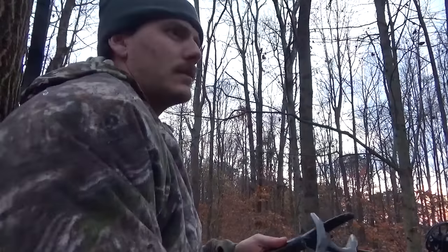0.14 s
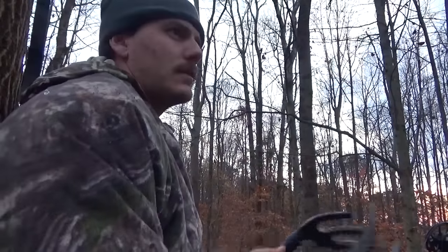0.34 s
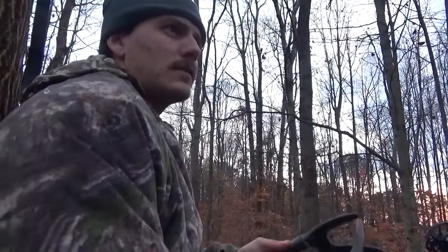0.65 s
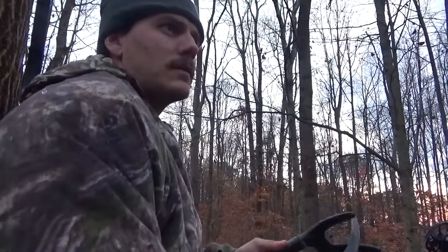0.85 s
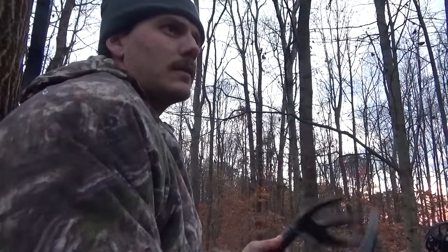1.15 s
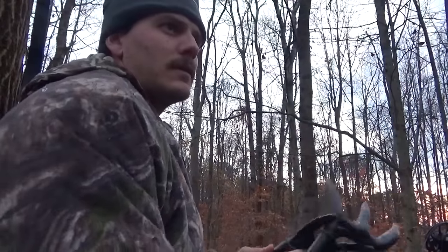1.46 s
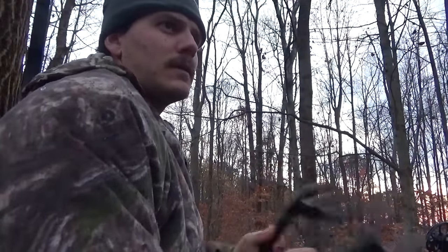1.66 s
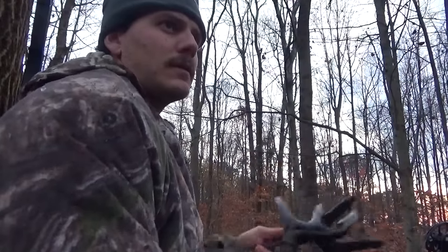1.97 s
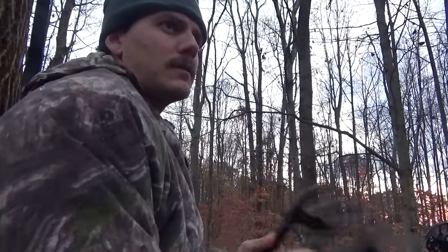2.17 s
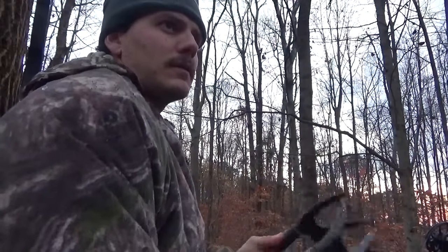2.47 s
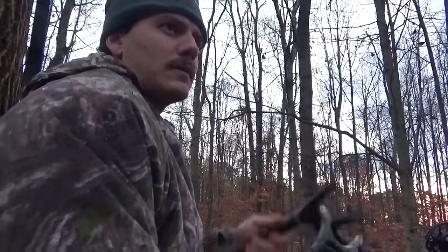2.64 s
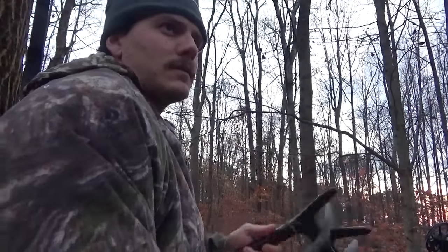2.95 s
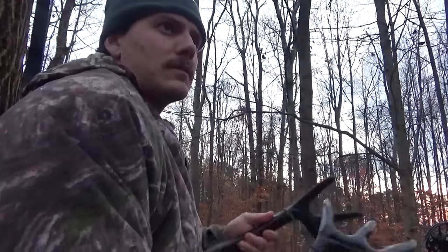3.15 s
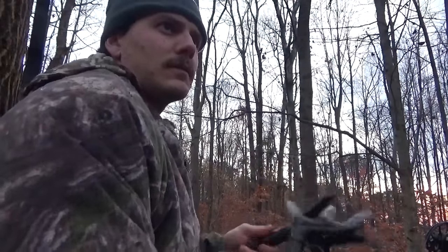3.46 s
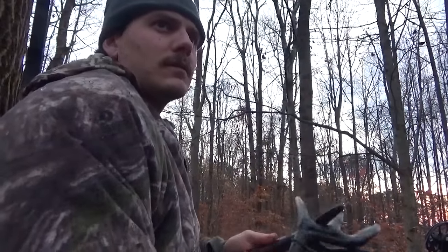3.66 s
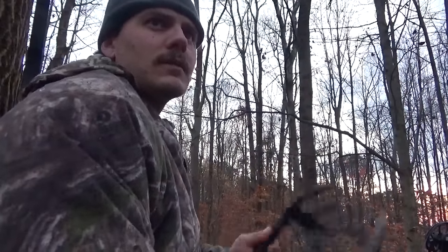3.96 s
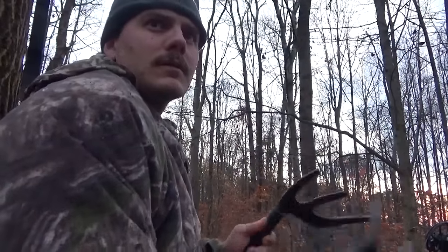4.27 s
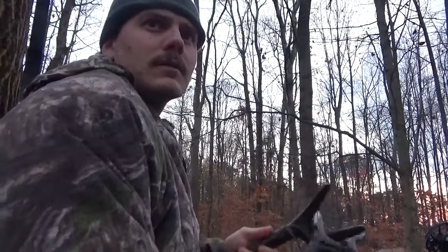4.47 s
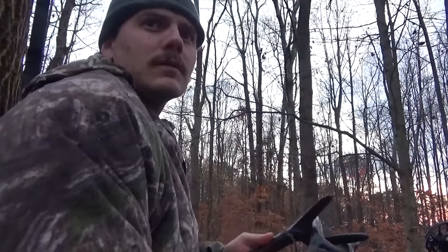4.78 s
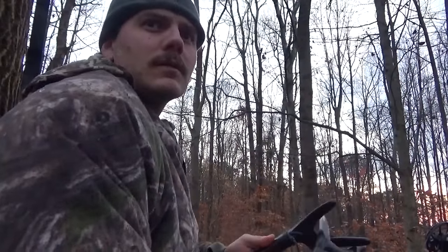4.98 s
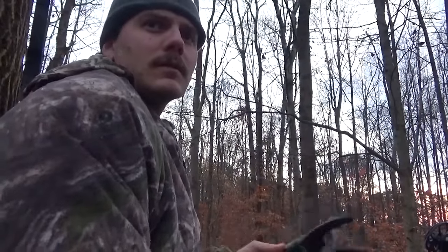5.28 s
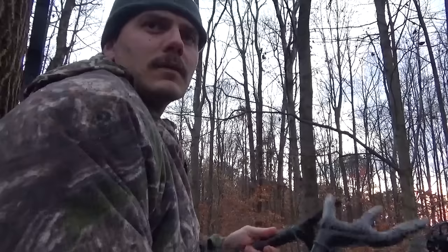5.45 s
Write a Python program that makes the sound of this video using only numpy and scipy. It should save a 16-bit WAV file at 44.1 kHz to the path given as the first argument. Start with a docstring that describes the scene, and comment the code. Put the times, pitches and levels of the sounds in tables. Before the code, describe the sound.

Two deer antlers clack and grind together in fast, uneven bursts with brief pauses, close by in quiet bare woods.

```python
"""Antlers rattled in bare woods

Two antlers clash and grind in quick runs, a step away from a camera. Each blow snaps and briefly rings
a bank of decaying bone modes; between blows, sliding tines excite the modes with random ticks.
Trunks return a thin echo of sparse decaying taps over a quiet floor of shaped noise.
The camera's limiter holds the loudest clacks down."""
import sys
import numpy as np
from scipy import signal
from scipy.fft import rfft, irfft
from scipy.io import wavfile
from scipy.ndimage import uniform_filter1d

SR = 44100
rng = np.random.default_rng(int(sys.argv[2]) if len(sys.argv) > 2 else 0)


def pcm_store(signal):
    """Save signal as 16-bit PCM."""
    levels = np.round(np.clip(np.atleast_2d(signal), -1, 1) * 32767)
    wavfile.write(sys.argv[1], SR, levels.astype(np.int16).T)


N = 247842

# Blows. Each row: start in seconds, relative strength in dB, two favoured pitches in Hz,
# brightness in dB (high modes up, low modes down).
BLOWS = [(0.0816, -38, 2430, 757, -20), (0.3197, -22, 2530, 1930, -4.5), (0.3546, -4, 1920, 4250, -0.5),
         (.372, -21, 1810, 4580, 3), (.38, -12.5, 6300, 5030, 6), (.393, -15, 3000, 1770, -6),
         (0.3969, -9.5, 4630, 1592, -10.5), (0.4095, -6.5, 4460, 1750, -14), (.423, -5.5, 4040, 1488, -9),
         (0.4387, -13, 3760, 4950, 9), (0.452, -8.5, 1944, 1655, -6), (0.4574, -11.5, 2765, 2010, -11),
         (0.4672, -12.5, 2800, 2480, -6), (0.5585, -8.5, 4440, 3560, 6), (.572, -11.5, 4540, 2070, -0.5),
         (.584, -17.5, 3350, 4500, -5), (0.6288, -33.5, 1590, 2100, -11), (.7214, -29, 3780, 1620, -3),
         (1.0972, -38.5, 1720, 1310, -11), (1.1165, -30, 2030, 1650, -9), (1.1493, -38.5, 1800, 733, -11),
         (1.2382, -8, 3160, 1900, 2), (1.244, 0, 3620, 2510, 5.5), (1.257, -5, 1624, 2070, 2),
         (1.2675, -8.5, 2680, 1840, 1), (1.2834, -15.5, 1990, 3750, -6), (1.32, -10, 5020, 1960, 5.5),
         (1.3317, -19.5, 3620, 1204, -9), (1.3892, -6.5, 4690, 2950, 8), (1.4622, -33.5, 1620, 1260, -16),
         (1.5418, -26.5, 3870, 1730, -15), (1.5603, -21, 4540, 1210, 0.5), (1.6349, -7, 6180, 4480, 4),
         (1.652, -15.5, 4000, 1890, 0), (1.7124, -3, 5830, 3143, -3), (1.7228, -6, 3200, 1573, 2),
         (1.7379, -8, 7000, 3420, 7), (1.7585, -11, 4630, 1950, 0.5), (1.762, -8, 4950, 1590, 4),
         (1.7829, -10.5, 3800, 3180, 1), (1.8161, -8.5, 4190, 5680, 3.5), (1.8347, -12.5, 2710, 1124, -6),
         (1.844, -19.5, 3170, 1890, -13), (1.8735, -13, 1990, 1364, -6), (1.8897, -9.5, 2895, 1780, -11.5),
         (1.975, -15, 1800, 2926, -12.5), (1.99, -18.5, 1230, 890, -14), (2.0251, -26.5, 4000, 960, -16),
         (2.0378, -27.5, 4130, 2520, -5), (2.1777, -7.5, 3170, 1587, 5.5), (2.1853, -11, 1950, 805, -5.5),
         (2.2048, -6.5, 6640, 4450, 6), (2.2277, -3, 4280, 1773, -6), (2.2434, -8.5, 2950, 1086, -5),
         (2.2491, -9, 2700, 1840, -14), (2.2579, -10, 1850, 3050, -5), (2.2745, -7, 3940, 1900, -9.5),
         (2.2932, -20, 1380, 1860, -10), (2.326, -20.5, 2390, 1420, -9), (2.34, -28, 1580, 900, -2),
         (2.4413, -9, 3560, 5150, 3.5), (2.454, -28, 3580, 2280, 7), (2.465, -24, 2360, 1270, -6),
         (2.5245, -10, 4800, 3980, 4), (2.535, -23, 3700, 2950, -6), (2.5671, -15, 4530, 2200, -2),
         (2.584, -11.5, 6760, 3820, 6), (2.596, -19, 3880, 2320, 1), (2.609, -18.5, 3150, 2100, 2),
         (2.6354, -7, 2140, 1041, -12.5), (2.6506, -13.5, 2160, 996, -10), (2.6596, -11, 2080, 5140, -3),
         (2.6866, 0, 5810, 3640, 9.5), (2.694, -6.5, 5150, 3730, 3), (2.699, -11, 3680, 1930, 3),
         (2.822, -1.5, 5280, 4680, 1.5), (2.8413, -6, 4620, 3850, -1), (2.852, -10, 4310, 2730, -6),
         (2.9025, -1.5, 3570, 2130, 1), (2.9126, 7, 4010, 6570, -2.5), (3.0115, -9, 4630, 3930, 6),
         (3.0201, -8.5, 5760, 4100, 4.5), (3.0264, -11, 4170, 3000, 1), (3.0379, -14.5, 3070, 3710, -2),
         (3.0867, -24.5, 4330, 2020, 0), (3.1382, -5.5, 5760, 4630, 5.5), (3.2386, -6.5, 3470, 4250, 5),
         (3.2927, -6.5, 3550, 1800, 0.5), (3.3324, 6, 5780, 3240, 5.5), (3.3364, 6.5, 5840, 1920, 3),
         (3.348, 1.5, 4370, 1730, -3.5), (3.359, -3.5, 4500, 1830, 7), (3.4154, -6, 2940, 1825, -8.5),
         (3.424, -19, 6200, 690, 23), (3.489, -27, 2930, 2150, -4), (3.569, -18, 1234, 2230, -11),
         (3.59, -30.5, 1800, 960, -21), (3.64, -9.5, 2950, 1395, -7.5), (3.664, -24, 1406, 840, -11),
         (3.8846, -36, 2930, 1605, -2), (3.916, -8.5, 4900, 3670, 6.5), (3.9305, -9, 4700, 3830, -2),
         (3.9742, 0.5, 6200, 2220, 5), (4.0042, -10.5, 4810, 2045, -3.5), (4.031, -25, 2000, 790, -16),
         (4.0455, -4, 4300, 6220, 8), (4.071, -8, 3460, 2220, -8), (4.0815, -4.5, 4580, 1614, -6.5),
         (4.0877, -14, 1640, 1070, -13), (4.0978, -8, 3470, 4630, -1), (4.1109, -8.5, 2080, 4420, -8),
         (4.1194, -9, 2180, 4470, -4.5), (4.141, -22, 3370, 2240, 2), (4.1492, -0.5, 2970, 1660, -3),
         (4.1581, -7, 2800, 1099, -4), (4.1674, -14.5, 2940, 1140, -14), (4.2243, -29, 2180, 813, -13),
         (4.2419, -19, 2170, 1650, -4.5), (4.264, -8.5, 1870, 4050, 2.5), (4.3831, -3.5, 4060, 5300, 6),
         (4.3935, -7, 6260, 1830, -1.5), (4.421, -5.5, 5420, 3207, -2.5), (4.4373, -13.5, 2180, 1660, -3),
         (4.4508, 4.5, 3615, 1770, -4), (4.468, -18, 3400, 556, -10), (4.475, -11.5, 5290, 2910, -11),
         (5.05, -10, 4780, 3550, 7.5), (5.0739, -13, 4760, 5780, -4), (5.0997, -9, 4400, 1910, -1),
         (5.1192, 0, 4560, 5810, 0.5), (5.1439, -19, 2040, 1480, -2), (5.1823, -9.5, 4340, 1640, 2),
         (5.2013, -10.5, 6420, 2440, -2), (5.2093, -7.5, 3010, 3800, -4), (5.2287, -12.5, 1600, 1250, -12),
         (5.2436, -5, 5150, 2490, -2), (5.2582, -16.5, 1520, 788, -17.5), (5.2708, -4.5, 3360, 4110, -4.5),
         (5.292, -5.5, 2800, 2450, -2), (5.2952, -8.5, 2420, 1790, -5), (5.3439, -7.5, 3540, 2480, 0.5),
         (5.362, -5, 3540, 2990, -2), (5.4269, -20, 2900, 1810, -5), (5.4982, -8, 2830, 4250, 3.5),
         (5.5219, -11, 5500, 2960, -1), (5.6036, -8, 3870, 1747, 3)]
# Tines sliding on each other. Each row: start and end in seconds, pressure at start and at end in dB,
# centre of the favoured pitch in Hz.
SCRAPES = [(0.075, 0.254, -48, -68, 1295), (0.224, 0.28, -49.5, -51.5, 1150),
           (.266, 0.321, -46, -35.5, 2400), (0.357, .474, -37, -18.5, 2970),
           (0.467, 0.543, -34, -29.5, 1830), (0.562, 0.603, -43, -37.5, 2250),
           (0.688, 0.726, -50, -48, 1990), (1.041, 1.12, -55, -51, 1735), (1.243, 1.313, -30.5, -29, 1926),
           (1.32, 1.396, -54, -34.5, 1250), (1.377, 1.448, -30, -50.5, 3920),
           (1.468, 1.562, -51, -31.5, 1594), (1.663, 1.683, -31, -51, 1330),
           (1.732, 1.777, -17, -34.5, 4220), (1.803, 1.881, -38, -27, 3100),
           (1.867, 2.01, -27, -41.5, 1738), (2, 2.061, -36.5, -35.5, 2380),
           (2.217, 2.272, -20.5, -21, 1807), (2.28, 2.372, -22.5, -42, 1850),
           (2.351, 2.443, -41, -37.5, 2234), (2.481, 2.527, -47, -37, 3300),
           (2.582, 2.691, -28.5, -30.5, 2240), (2.692, 2.723, -38, -32, 1930),
           (2.861, 2.901, -34, -45, 1620), (2.921, 2.97, -6, -44, 1730), (3.064, 3.098, -50, -33, 3230),
           (3.333, 3.412, -10.5, -41, 1850), (3.413, 3.451, -14, -48, 1052), (3.652, 3.69, -26, -56, 1350),
           (3.861, 3.891, -58, -31, 1600), (4.077, 4.144, -18.5, -38, 1646), (4.17, 4.2, -26, -45, 1190),
           (4.209, 4.238, -49, -22, 2150), (4.385, 4.475, -31, -19, 556), (4.457, 4.516, -23, -37, 1147),
           (5.184, 5.302, -29, -26, 1670), (5.355, 5.415, -29.5, -37, 1530)]
# Bone modes. Each row: frequency in Hz, relative level in dB, t60 in seconds before damping by the hands.
BONE_MODES = [(327.4, -11, 0.067), (411.6, -18, 0.11), (556, -17, 0.19), (690, -20, 0.052), (790, -8, 0.13),
              (960, -6.5, 0.061), (1126, -5, 0.091), (1358, -0.5, 0.063), (1646, -1.5, 0.078),
              (1850, 1.5, 0.038), (2080, 4, 0.036), (2220, -6.5, 0.044), (2450, -1.5, 0.055),
              (2800, -3.5, 0.05), (2950, 2.5, 0.037), (3405, 3.5, 0.029), (3906, 6, 0.022), (4300, 2, 0.04),
              (4450, 3.5, 0.024), (4606, 1, 0.023), (4834, 2.5, 0.027), (5415, 10.5, 0.016),
              (5780, 7, 0.024), (6200, 7.5, 0.023), (6575, 7, 0.028), (6880, 2.5, 0.019),
              (7720, -1.5, 0.022), (8910, 3, 0.018), (8770, -14, 0.021), (9700, -3, 0.03)]
# Spectrum of the contact snap. Each row: frequency in Hz, relative level in dB.
SNAP_COLOUR = [(300, -42), (1000, -6.5), (2500, -3.5), (5000, -3), (7500, 4.5), (11000, -10.5)]
# Copies off body and ground. Each row: delay in seconds, left level in dB, right level in dB.
BOUNCES = [(.0027, -18, -23), (.0046, -16.5, -17), (.0085, -31, -25)]
# Echo decay. Each row: frequency in Hz, t60 in seconds.
WOODS_T60 = [(250, 0.93), (700, 0.75), (2000, 1), (4500, 0.89), (7000, 0.55), (10000, 0.43)]
# Echo spectrum. Each row: frequency in Hz, relative level in dB.
WOODS_COLOUR = [(500, 10), (1100, 3), (2000, 0.5), (2700, -0.5), (3900, 0.5), (6000, 3), (10000, 7)]
# Background spectrum. Each row: frequency in Hz, relative density in dB per Hz.
AIR_COLOUR = [(30, -7), (70, -20), (110, -40), (122, 2.5), (136, -13), (300, -9), (800, -5.5), (2000, -8),
              (4000, -12.5), (11000, -20)]
# Background width. Each row: frequency in Hz, left-right likeness (1 = identical).
AIR_LIKENESS = [(60, .85), (130, 1), (270, 0.83), (800, 0.49), (3000, 0.58), (10000, 0.74)]
# Antlers right of centre. Each row: frequency in Hz, left minus right level in dB.
LEAN = [(300, 0.5), (1100, -.55), (4000, -1.2), (10000, -2.8)]
# How far one contact strays sideways. Each row: frequency in Hz, level in dB.
SWAY = [(300, -11.5), (2000, -13), (5000, -14.5), (10000, -8)]
# The antlers' sound carries little bass. Each row: frequency in Hz, level in dB.
THINNESS = [(30, -38), (120, -32), (300, -8), (600, 0)]

AIR_RMS_DB, ECHO_DB = -55, -21.5
SENSOR_HZ, LAST_EDGE_HZ = 11050, 12220
OUTER_DB = -8.0  # low and high modes both sit under the middle ones
GRIP_FACTOR, GRIP_SPREAD = 1.17, 0.12  # damping by the hands; its log scatter from blow to blow
GRIP_PER_DB = 0.0066  # bright blows on the tine tips die sooner, dull ones on the beam ring on
SCRAPE_DAMPING_FACTOR, TICKS_PER_S = 3.93, 2200
DULL_AT_2KHZ_DB, DULL_DB_PER_OCTAVE = 4.5, 1.5  # scrapes are dull, more so the lower they ring
LIMIT_DB, LIMITER_LAG_S, RELEASE_DB_PER_S = -3.5, 0.0001, 540.0
CEILING = 0.8


def gain_of(db):
    """Amplitude factor of a dB level."""
    return 10 ** (np.asarray(db) / 20)


def evened(x):
    """Scales x to unit RMS."""
    return x / np.sqrt(np.mean(x ** 2) + 1e-20)


def read(points, hz):
    """Reads a curve along log frequency."""
    f, value = np.transpose(points)
    return np.interp(np.log(hz + 1), np.log(f + 1), value)


def add(mix, start_s, sound):
    """Adds a sound to mix in place, cut at the end."""
    part = mix[round(start_s * SR):][:len(sound)]
    part += sound[:len(part)]


def coloured(x, points):
    """Weights the spectrum of x by a dB curve."""
    hz = np.fft.rfftfreq(x.shape[-1], 1 / SR)
    return irfft(rfft(x) * gain_of(read(points, hz)), x.shape[-1])


def low_pass(x, hz):
    """Steep linear-phase band edge."""
    taps = signal.firwin(401, hz, window=("kaiser", 8), fs=SR)
    return signal.oaconvolve(x, taps[None], "same")


def air():
    """A faint far hum, rumble and hiss: shaped stereo noise with slowly drifting patches."""
    frames, hz = N // 1024 + 5, np.fft.rfftfreq(4096, 1 / SR)
    a, b, c, d, patches_db = rng.standard_normal((frames, 2049, 5)).T
    patches_db = uniform_filter1d(patches_db, size=40, axis=0)  # across frequency
    patches_db = evened(uniform_filter1d(patches_db, size=4, axis=1))  # across time
    same = np.clip(read(AIR_LIKENESS, hz), -1, 1)[:, None]
    left = a + 1j * b
    right = same * left + np.sqrt(1 - same ** 2) * (c + 1j * d)
    z = np.array([left, right]) * gain_of(read(AIR_COLOUR, hz)[:, None] + patches_db)
    noise = signal.istft(z, nperseg=4096, noverlap=3072)[1][:, :N]
    return gain_of(AIR_RMS_DB) * evened(noise)


def ring(t, shade, pitches_hz, damping, chance):
    """Bone modes start together; the place of contact favours two pitches and shades low against high."""
    hz, mode_db, t60_s = np.transpose(BONE_MODES)[:, :, None]
    luck, detune, side = chance.T[:, :, None]
    start_db = mode_db + read(shade, hz) + 10.4 * (luck - .5)
    hz = hz * (1 + 0.00068 * np.sqrt(hz) * (detune - .5))  # the grip shifts high modes more
    for pitch_hz, favour_db in zip(pitches_hz, (8.0, 7.0)):
        apart = abs(np.log(hz / pitch_hz))
        nearest = apart == apart.min()
        start_db = start_db + favour_db * np.exp(-(apart / 0.1) ** 2) + 3.94 * nearest
        hz = np.where(nearest, pitch_hz, hz)  # nearest mode is drawn onto the pitch
    rise = 1 - np.exp(-t * hz / 1.55)  # low modes take longer to swing up
    swing = np.sign(side - .4) * rise * np.sin(2 * np.pi * hz * t)
    level_db = start_db - 60 * t * np.clip(damping, .7, 4) / t60_s
    return (gain_of(level_db) * swing).sum(0)


def grind():
    """Ridges catch and slip in uneven ticks; the ring's colour drifts as the contact slides along."""
    tick_gain = gain_of(3.5 * np.minimum(rng.exponential(1, N), 4))
    ticks = tick_gain * (rng.random(N) < TICKS_PER_S / SR) * rng.standard_normal(N)
    out, t = np.zeros((2, N)), np.arange(2048) / SR  # rows: sound, sideways stray
    chance = rng.random((len(SCRAPES), 3, len(BONE_MODES), 3))
    sides = rng.standard_normal(len(SCRAPES))
    for (start_s, end_s, start_db, end_db, pitch_hz), places, side in zip(SCRAPES, chance, sides):
        dull_db = DULL_AT_2KHZ_DB + DULL_DB_PER_OCTAVE * np.log2(2000 / pitch_hz)
        shade = [(400, 2 * dull_db), (2500, 0.0062), (8000, -dull_db)]
        slips = evened(ticks[round(start_s * SR):round(end_s * SR)])
        along = np.linspace(0, 2, len(slips))
        pressure = gain_of(np.linspace(start_db, end_db, len(slips)))
        pressure = pressure * signal.windows.tukey(len(slips), .25)
        for k, c in enumerate(places):  # crossfade through three contact places
            pitches_hz = (pitch_hz * (.94 + 0.126 * c[1, 0]), 1500 + 3500 * c[0, 0])
            body = ring(t, shade, pitches_hz, SCRAPE_DAMPING_FACTOR, c)
            here = np.cos(np.pi / 2 * np.clip(along - k, -1, 1))
            sound = signal.fftconvolve(slips * pressure * here, body / np.linalg.norm(body))
            add(out[0], start_s, sound)
            add(out[1], start_s, side * sound)
    return out


def blow(strength_db, first_hz, second_hz, bright_db, chance, noise, hold):
    """A sharp noise snap of contact over the ringing bone; the snap's treble dies first."""
    t = np.arange(len(noise)) / SR
    shade = [(1200, OUTER_DB - bright_db), (2600, 0.023), (5000, 0.041), (7500, OUTER_DB + bright_db)]
    damping = GRIP_FACTOR * np.exp(GRIP_PER_DB * bright_db + GRIP_SPREAD * hold)
    bone = ring(t, shade, (first_hz, second_hz), damping, chance)
    snap = coloured(coloured(noise, SNAP_COLOUR), shade)
    dull = coloured(snap, [(4000, 6.5), (8000, -44)])
    fade_db = -60 * t * np.clip(damping, .3, 4)
    # t60 before damping: 0.04 s dull part, 0.022 s rest
    snap = dull * gain_of(fade_db / 0.04) + (snap - dull) * gain_of(fade_db / 0.022)
    bone_rms, snap_rms = [np.sqrt(np.mean(v[:300] ** 2)) for v in (bone, snap)]
    sound = bone / bone_rms + gain_of(-3.0) * snap / snap_rms
    return gain_of(strength_db - 6.5) * sound / np.sqrt(np.mean(sound[:300] ** 2))


def clacks():
    """Every blow in its place; the second row is how far each strays to one side."""
    chance = rng.random((len(BLOWS), len(BONE_MODES), 3))
    noise = rng.standard_normal((len(BLOWS), 3072))
    side_hold = rng.standard_normal((len(BLOWS), 2))
    out = np.zeros((2, N))
    for (start_s, *row), c, n, (side, hold) in zip(BLOWS, chance, noise, side_hold):
        sound = blow(*row, c, n, hold)
        add(out[0], start_s, sound)
        add(out[1], start_s, side * sound)
    return out


def nearby(x, stray):
    """Direct sound, treble leaning right, strays with each contact; body and ground add quick copies."""
    lean = np.array(LEAN)
    # a quarter turn: it arrives earlier at one port, not louder
    stray = signal.hilbert(coloured(stray, SWAY)).imag
    out = np.array([x + stray, x - stray])
    for delay_s, left_db, right_db in BOUNCES:
        lag = round(delay_s * SR)
        out[0, lag:] += gain_of(left_db) * x[:-lag]
        out[1, lag + 1:] += gain_of(right_db) * x[:-lag - 1]
    return np.array([coloured(out[0], lean * [1, .5]), coloured(out[1], lean * [1, -.5])])


def woods(x):
    """Trunks scatter sound: sparse taps of random sign, each band dying at its own speed."""
    slots, out = np.arange(400, SR - 20, 20), 0
    for k in range(3):  # three random tails fade in and out in turn, so no band of the echo stands still
        taps = np.zeros((3, SR))
        at = slots + rng.integers(0, 20, (3, len(slots)))
        np.put_along_axis(taps, at, rng.choice([-1., 1.], at.shape), 1)
        taps = 0.94 * taps[2] + 0.73 * taps[:2]  # much of the echo reaches both ports alike
        hz, t, z = signal.stft(taps, SR, nperseg=256)
        build = 1 - np.exp(-t / 0.01)  # more trunks answer as the wave spreads
        fade_db = read(WOODS_COLOUR, hz)[:, None] - 60 * t / read(WOODS_T60, hz)[:, None]
        tail = signal.istft(z * build * gain_of(fade_db), SR, nperseg=256)[1]
        tail = tail / np.linalg.norm(tail[0])
        turn = np.sqrt(2 / 3) * np.cos(2 * np.pi * (np.arange(N) / SR * 9 + k / 3))  # steady 9 Hz
        out = out + signal.fftconvolve((turn * x)[None], tail, axes=1)[:, :N]
    return out


def scene():
    """Antlers nearby, their echo and the background."""
    antlers, stray = coloured(clacks() + grind(), THINNESS)
    return nearby(antlers, stray) + gain_of(ECHO_DB) * woods(antlers) + air()


def record(dry):
    """Sensor band limit, limiter just too late for the first spike, soft ceiling, bass cut, band edge."""
    x = low_pass(dry, SENSOR_HZ)
    peak_db = 20 * np.log10(abs(x).max(0) + 1e-6)  # one control for both channels
    fall_db = np.arange(N) * RELEASE_DB_PER_S / SR
    held_db = np.maximum.accumulate(peak_db + fall_db) - fall_db
    over_db = np.maximum(held_db - LIMIT_DB, 0)
    lag = np.exp(-1 / (LIMITER_LAG_S * SR))
    x = x / gain_of(signal.lfilter([1 - lag], [1, -lag], over_db))
    x = CEILING * np.tanh(x / CEILING)
    x = signal.sosfilt(signal.butter(2, 85, "high", fs=SR, output="sos"), x)
    return low_pass(x, LAST_EDGE_HZ)


dry = scene()
out = record(dry)
pcm_store(out)
```